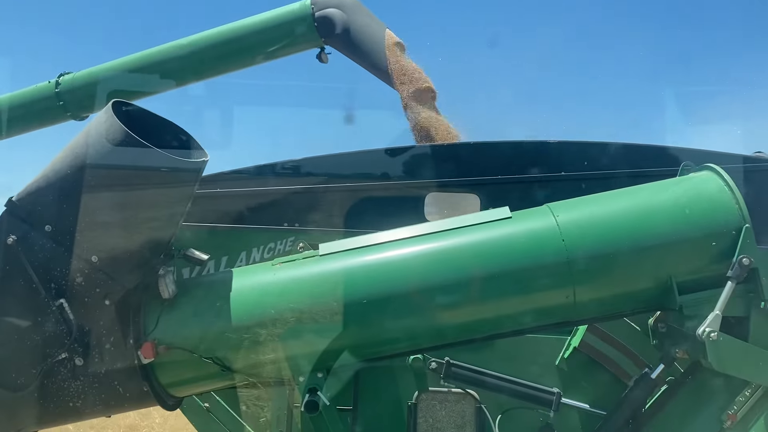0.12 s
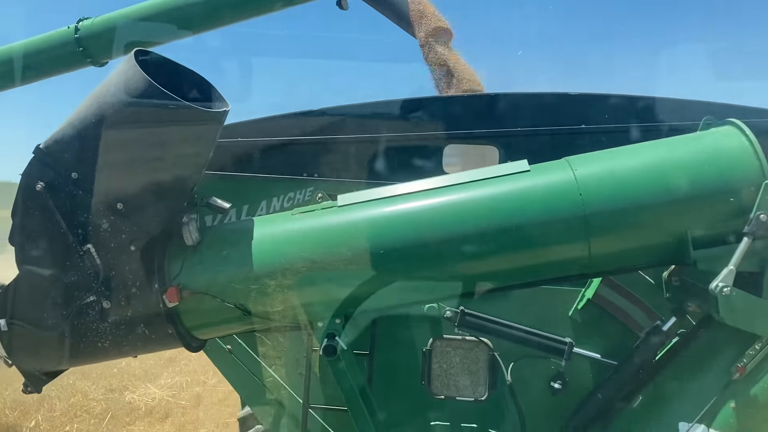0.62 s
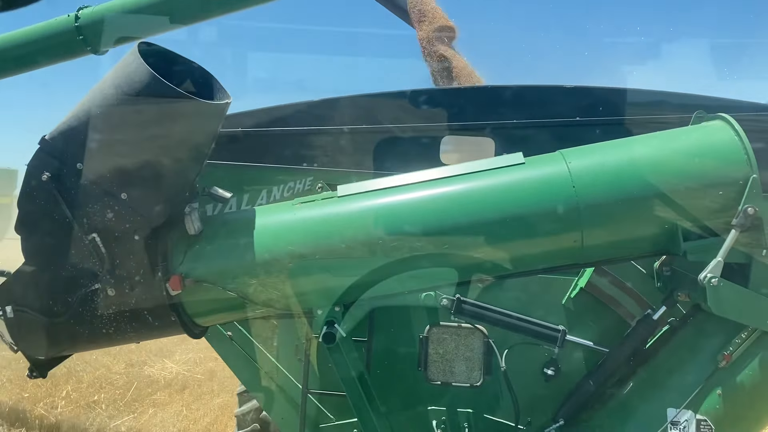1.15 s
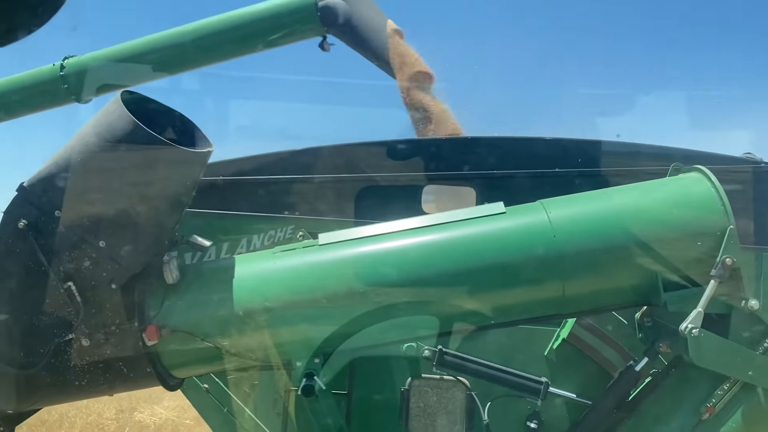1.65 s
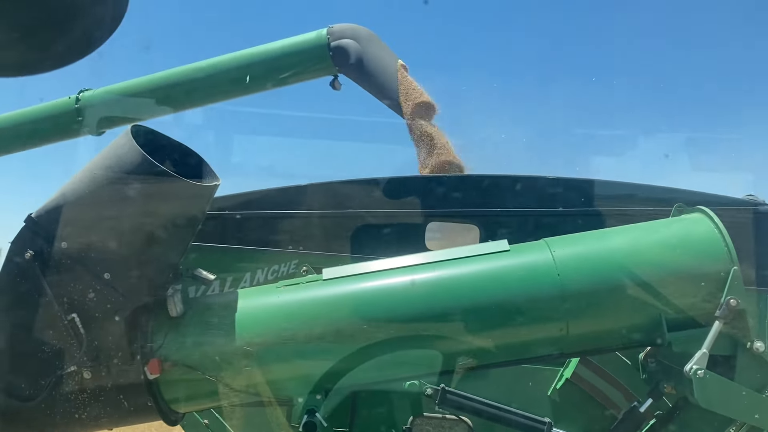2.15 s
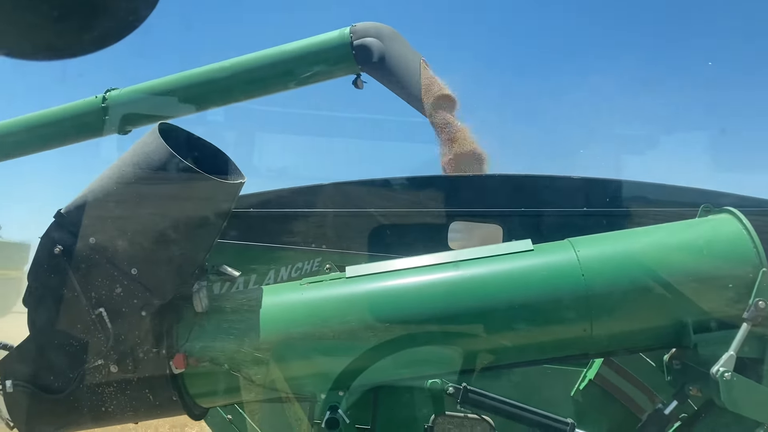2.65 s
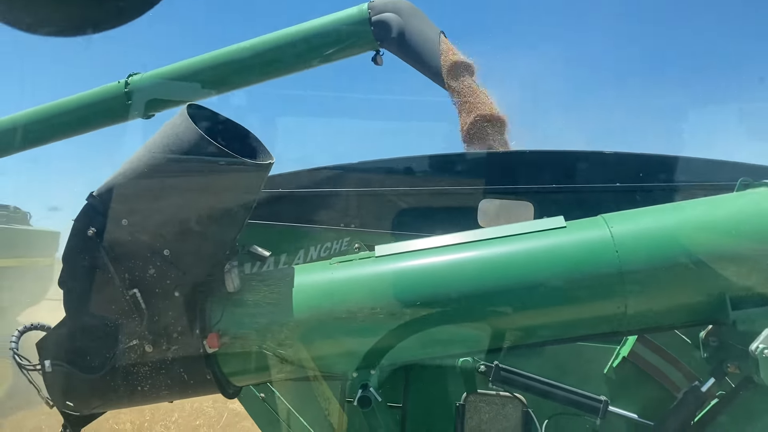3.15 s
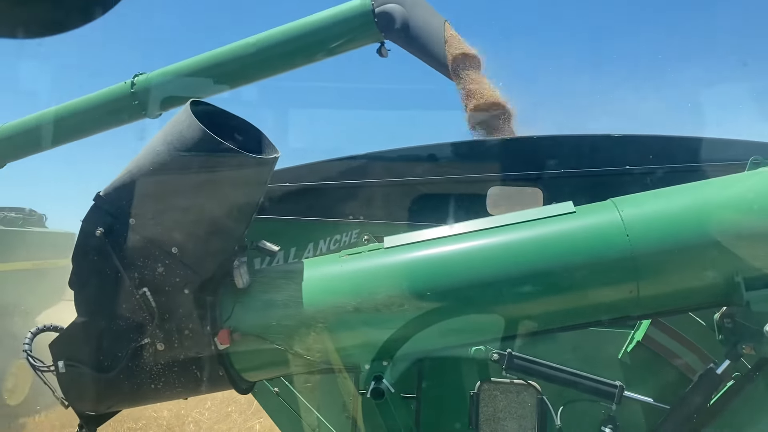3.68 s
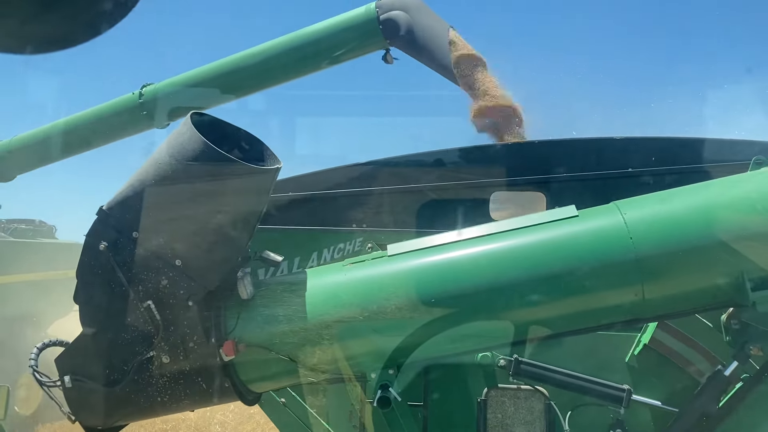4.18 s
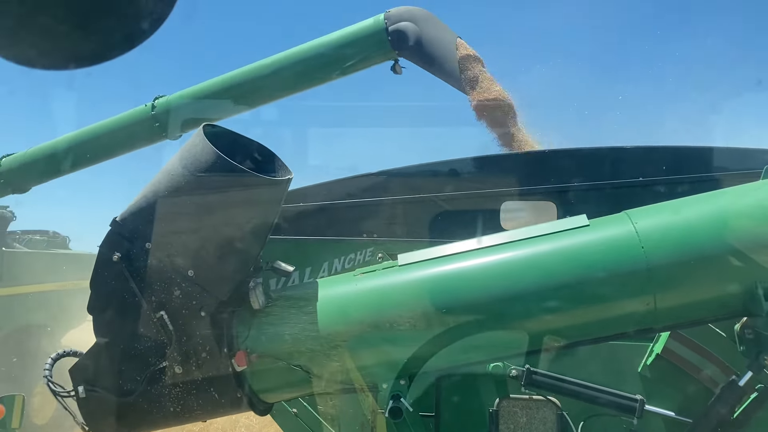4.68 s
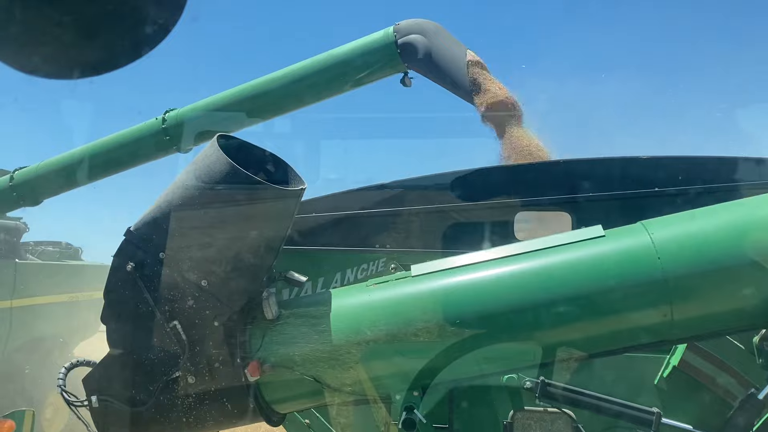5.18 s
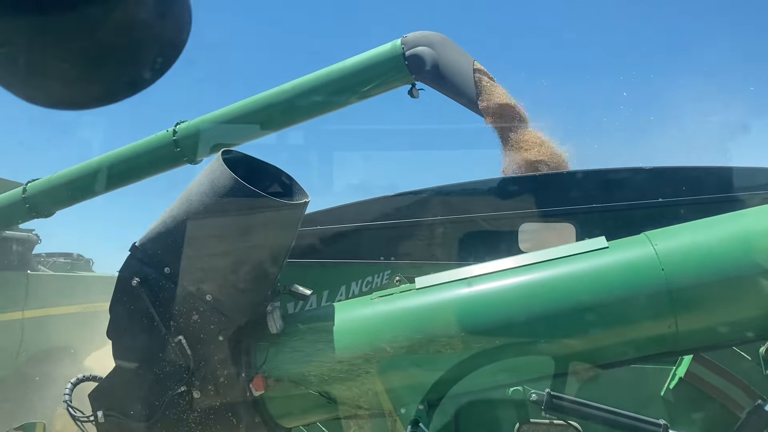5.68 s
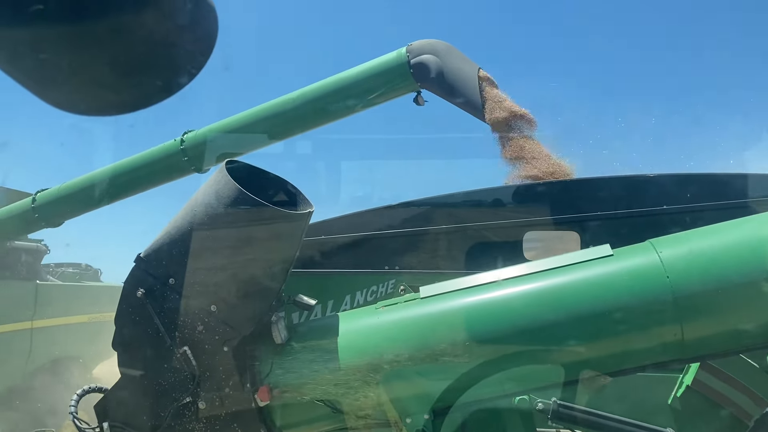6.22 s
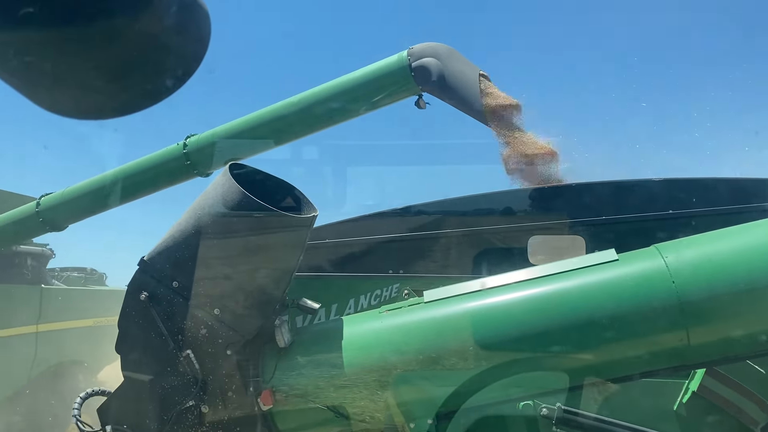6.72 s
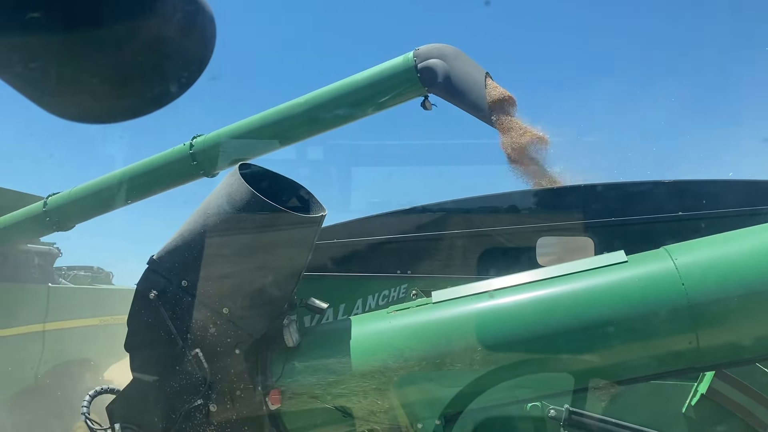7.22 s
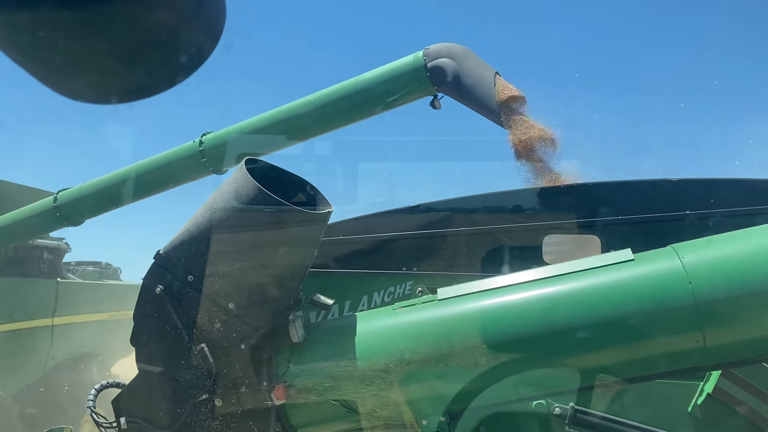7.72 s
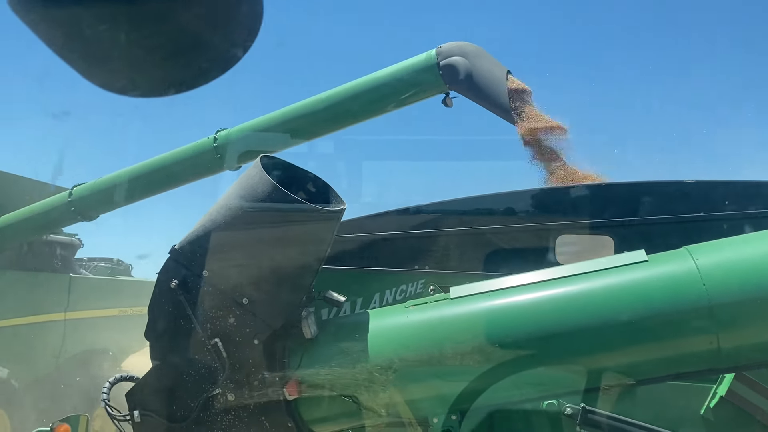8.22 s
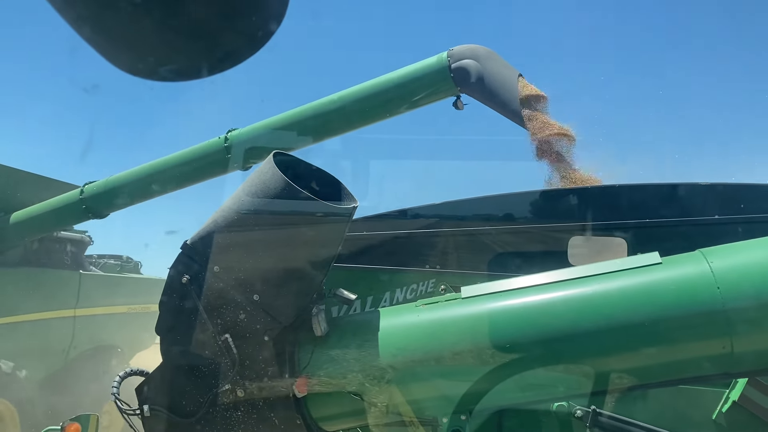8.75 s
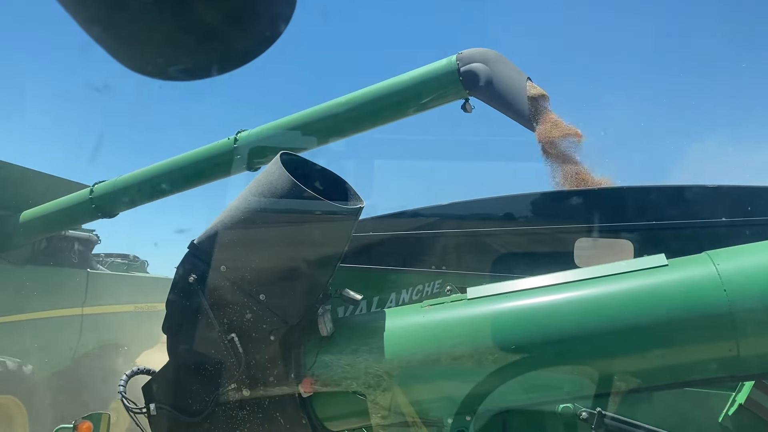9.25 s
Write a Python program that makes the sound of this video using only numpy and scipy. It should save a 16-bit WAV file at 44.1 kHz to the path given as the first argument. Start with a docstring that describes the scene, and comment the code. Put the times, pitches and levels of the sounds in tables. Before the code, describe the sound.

Heard from inside a closed tractor cab, a six-cylinder diesel drones steadily at constant speed, with a heavy low rumble that throbs irregularly as the cab jolts over ground. Hydraulic pump and gear hums sit above it, with a faint fluttering whine, soft fan hiss and a barely audible high whistle. Brief dry rattles scatter throughout; a few short rising squeaks come early. Close handheld stereo, bass-heavy.

```python
"""A six-cylinder diesel booms through the cab of a tractor crossing a field: sines on its cycle orders.
Sines locked to its speed make the pump and gear meshes hum; others drift freely as whine and turbo whistle.
Shaped noise makes the rumble, cab drone and vent air; loose fittings rattle (noise bursts through
resonances) and joints creak (gliding sines). Two microphone ports a few centimetres apart hear it."""
import sys
import numpy as np
from scipy import signal
from scipy.fft import rfft, irfft, next_fast_len
from scipy.io import wavfile
from scipy.ndimage import uniform_filter1d

SR = 44100
rng = np.random.default_rng(int(sys.argv[2]) if len(sys.argv) > 2 else 0)


def inscribe(sig):
    """Save sig as 16-bit PCM at rate SR to the path in sys.argv[1].

    A 1-D sig is mono; a 2-D sig holds one channel per row.
    Samples are clipped to [-1, 1] before scaling.
    """
    pcm = np.round(np.clip(np.atleast_2d(sig).T, -1, 1) * 32767)
    wavfile.write(sys.argv[1], SR, pcm.astype(np.int16))


def gain_from_db(level_db):
    """Convert decibel levels to linear amplitude factors (20 dB per decade)."""
    decades = np.asarray(level_db, float) / 20
    return 10 ** decades


N = 413216
T = np.arange(N) / SR
MUTE_DB = -200  # shuts a noise out of a frequency range
EDGE_HZ = 15750  # top of the hiss and the rattles


def evened(x):
    """Scales to rms 1."""
    return x / np.sqrt(np.mean(x ** 2) + 1e-20)


def curve(rows, column):
    """One column of a time table at every sample."""
    return np.interp(T, [r[0] for r in rows], [r[column] for r in rows])


def read(points, hz):
    """A spectrum table on a log-frequency axis."""
    f, value = np.transpose(points)
    return np.interp(np.log(hz + 1), np.log(f + 1), value)


def wander(rate_hz):
    """Random wavering of rms 1: 16 sines of random phase up to a rate, held for 64 samples."""
    slow_t = T[::64]
    rates = np.geomspace(rate_hz / 20, rate_hz, 16)
    total = sum(np.sin(2 * np.pi * (f * slow_t + rng.random())) / np.sqrt(f) for f in rates)
    return evened(total).repeat(64)[:N]


def bump(s, half_s):
    """A bell in time, down to 1/e half_s away from its middle."""
    return np.exp(-((T - s) / half_s) ** 2)


def tone(hz, db, tilt_db=0., lead=0.):
    """A sine of rms level db, tilted left-right by tilt_db; the right port leads by lead radians."""
    angle = 2 * np.pi * (np.cumsum(hz) / SR + rng.random())
    left = gain_from_db(tilt_db / 2) * np.sin(angle)
    right = gain_from_db(-tilt_db / 2) * np.sin(angle + lead)
    return np.sqrt(2) * gain_from_db(db) * np.array([left, right])


def level(name):
    """A strong tone's usual dB with its slow wavering and its swells."""
    # usual level by tone name: (level_db, wavering_depth_db rms)
    usual = {"stroke": (-37, 1.5), "stroke x2": (-40, 3.4), "stroke x3": (-46, 1.2), "charge": (-41.5, 1.1),
             "fifteenth": (-30.5, 3.4), "firing": (-25, 0.89)}
    # passing swells and dips by tone name: (middle_s, half_length_s, lift_db)
    swells = {"stroke": [(.5, 0.24, 7), (1.75, 0.23, -8), (2.3, 0.36, 1), (3.45, .2, 2), (6.95, 0.18, -12),
              (8.1, .12, -11)], "stroke x2": [(.55, 0.26, 9), (1.2, 0.33, 7.5), (2.6, 0.25, 3.5),
              (3.45, 0.18, 4.5), (5.45, 0.17, 6.5), (6.05, .2, -7), (8.55, 0.26, 3.5)],
              "stroke x3": [(.7, .5, -7), (2.45, 0.49, 4.5), (5.7, 0.67, 2.5), (7.4, 0.28, 1.5),
              (8.7, 0.4, 2.5)], "charge": [(.3, .3, 5), (2.7, 0.23, 3.5), (3.1, 0.083, -10),
              (3.6, 0.18, 3.5), (8.6, 0.22, 4)], "fifteenth": [(.65, 0.14, 6), (1.75, .25, -6),
              (2.4, 0.24, 1), (6.75, 0.31, 6.5), (7.7, 0.23, 5), (8.5, 0.16, 6)], "firing": [(.65, 0.14, 4),
              (5.3, 0.12, 2), (8.8, 0.27, -5.5)]}
    db, depth_db = usual[name]
    lift = sum(lift_db * bump(s, half_s) for s, half_s, lift_db in swells[name])
    return db + depth_db * wander(3.) + lift


def resonate(x, hz, width):
    """A band-pass resonance of gain 1."""
    return signal.lfilter(*signal.iirpeak(hz, hz / width, SR), x)


def at_ports(one, other, db_of_hz):
    """Colours two unrelated draws of a sound and mixes them into a partly alike, phase-shifted pair."""
    # how the ports differ: (hz, likeness 0-1, right_lead_rad)
    port_pair = [(45, 1, 0), (62, 0.95, -0.1), (85, 0.94, 0), (345, 0.92, 0.23), (700, 0.81, 0.69),
                 (910, 0.36, 0.93), (1115, 0.23, 3), (2390, 0.29, 3.0), (2820, 0.11, 4), (3450, 0.29, 4),
                 (3910, 0.24, 3), (4220, 0.95, 8), (4880, 0, 5), (5500, .28, 4.5), (6170, 0.4, 4.5),
                 (7050, 1, 6.5)]
    # balance of the ports: (hz, left_minus_right_db)
    balance = [(40, 1.5), (80, -1.2), (210, -0.5), (500, 3), (1790, -0.5), (2740, -1), (6400, -.5),
               (9800, 0)]
    in_step_hz, delay_s = 6940, 1 / 4390  # the treble reaches the right port earlier
    hz = np.fft.rfftfreq(N, 1 / SR)
    f, alike, lead = np.transpose(port_pair)
    alike = np.clip(np.interp(hz, f, alike), 0, 1)
    # above the last point a steady delay holds
    lead = np.where(hz > f[-1], 2 * np.pi * (hz - in_step_hz) * delay_s, np.interp(hz, f, lead))
    left = rfft(one)
    right = (alike * left + np.sqrt(1 - alike ** 2) * rfft(other)) * np.exp(1j * lead)
    tilt = gain_from_db(read(balance, hz) / 2)
    return irfft(np.array([left * tilt, right / tilt]) * gain_from_db(db_of_hz(hz)), N)


def engine(cycle_hz):
    """Cylinders differ, so many orders of the engine cycle sound; each wavers on its own."""
    # weaker tones of the engine cycle: (order, level_db before wavering)
    weak_orders = [(2, -62), (3, -45), (4, -32), (7, -37), (10, -31), (11, -35), (17, -43), (18, -43)]
    firing, fifteenth = 6, 15  # cycle orders of the two strongest tones
    out = sum(tone(k * cycle_hz, db + 0.92 * wander(4.), -.6, 0.) for k, db in weak_orders)
    out += tone(firing * cycle_hz, level("firing") + 0.78 * wander(6.2), -1.7, 0.1)
    out += tone(fifteenth * cycle_hz, level("fifteenth") + 1.62 * wander(25.), -1.1, -0.06)
    return out


def pump(stroke_hz):
    """Hydraulic pump: its piston rate and two harmonics, plus a charge tone at 4/3 of that rate."""
    # stereo place of each piston tone: (left_minus_right_db, right_lead_rad)
    places = [(0.5, 0.62), (-1, -0.43), (-1, 1.92)]
    out = tone(4 / 3 * stroke_hz, level("charge") + 1.5 * wander(20.), 1.1, -.2)
    for k, name in enumerate(("stroke", "stroke x2", "stroke x3")):
        out += tone((k + 1) * stroke_hz, level(name) + 2.6 * wander(30.), *places[k])
    return out


def meshes(stroke_hz):
    """Weak gear-mesh tones, locked to the engine, that waver in level."""
    # gear meshes: (teeth_per_pump_stroke, level_db before wavering, left_minus_right_db, right_lead_rad)
    gears = [(1.028, -46, 0, 0), (2.374, -50, 5, -.5), (3.733, -65, 0, 3), (4.732, -68, 0, 3),
             (6.73, -63, 0, 2.5), (7.785, -63, -1, 3)]
    return sum(tone(teeth * stroke_hz, db + 2.6 * wander(6.6), tilt, lead)
               for teeth, db, tilt, lead in gears)


def transmission_whine():
    """A single transmission whine whose pitch and level drift and flutter."""
    # drift of the whine before its flutter: (time_s, pitch_hz, level_db)
    drift = [(0.0, 1855, -54), (0.62, 1856, -55), (0.68, 1852, -45), (0.76, 1858, -45), (0.82, 1876, -54),
             (1.36, 1867, -50), (1.84, 1846, -54), (2.4, 1849, -51), (2.64, 1861, -53), (3.15, 1851, -54),
             (3.3, 1852, -50), (4.0, 1859, -48), (4.4, 1854, -48), (4.6, 1859, -53), (4.9, 1868, -52),
             (5.5, 1853, -48), (6.2, 1853, -52), (6.96, 1855, -47), (7.6, 1855, -52), (8.1, 1860, -50),
             (8.5, 1846, -50), (9.37, 1852, -51)]
    pitch_hz = curve(drift, 1) + 8. * wander(60.)
    return tone(pitch_hz, curve(drift, 2) + 2.6 * wander(60.), 3., .8)


def turbocharger():
    """A faint, unsteady high whistle from the turbocharger."""
    # pitch as it follows the load, before its flutter: (time_s, pitch_hz)
    drift = [(0, 8060), (.5, 8030), (1.7, 7870), (2.55, 7955), (2.9, 7950), (4.2, 7790), (4.7, 7800),
             (5.0, 7900), (5.4, 7935), (6.6, 7900), (8.2, 7950), (8.7, 8040), (9.37, 8270)]
    db = -73 + 3. * wander(2.) + 3. * wander(12.)
    return tone(curve(drift, 1) + 5. * wander(20.), db, 0., 1.4)


def panels_db(hz):
    """The lift that ringing cab panels give to a noise, their powers added to it."""
    # panel resonances: (pitch_hz, width_hz, ringing_db relative to the plain noise)
    panels = [(362, 14, 2), (557, 16, 3), (602, 14, 3), (632, 30, 1.5), (666, 16, 3), (770, 20, 0),
              (860, 50, 2), (1058, 40, 1), (1176, 22, 2), (1259, 20, 1), (1313, 30, 1), (1582, 70, -1),
              (2100, 70, 1), (2454, 35, 2), (2600, 40, 0), (3154, 50, 0), (3445, 50, 1)]
    ringing = sum(gain_from_db(2 * db) / (1 + (2 * (hz - f) / width) ** 2) ** 2 for f, width, db in panels)
    return 10 * np.log10(1 + ringing)


def boom():
    """Random shaking of frame and panels, plus the drone of the cab air."""
    # structure-borne rumble before shaking and panel lift: (hz, level_db_per_hz)
    rumble = [(20, -68), (30, -67), (38, -57), (45, -54.5), (65, -44.5), (85, -47.5), (100, -35.5),
              (115, -42.5), (145, -41), (160, -42), (180, -44), (215, -47), (250, -48.5), (295, -56),
              (340, -59), (385, -62.5), (460, -63.0), (520, -60.5), (560, -58.5), (610, -56.5), (650, -60),
              (720, -62.5), (820, -67.5), (870, -65.5), (980, -71), (1100, -73)]
    frame_top_hz = 190  # below it the frame shakes with the ground
    drive = rng.standard_normal((2, N)) * np.sqrt(SR / 2)  # 0 dB per Hz

    def frame_db(hz):
        return read(rumble, hz) + MUTE_DB * (hz > frame_top_hz)

    def skin_db(hz):
        outside = (hz <= frame_top_hz) | (hz > rumble[-1][0])
        return read(rumble, hz) + panels_db(hz) + MUTE_DB * outside

    frame = at_ports(*drive * gain_from_db(1.3 * wander(8.)), frame_db)  # uneven shaking
    return frame + at_ports(*drive, skin_db) + drone()


def drone():
    """The cab air resonates near one pitch as the ground shakes it, and throbs on the jolts."""
    # strongest throbs, added to the steady drone as jolts go through the cab: (middle_s, level_db)
    throbs = [(.15, -20.5), (.38, -16.5), (.59, -22), (.71, -25), (.79, -21), (1.04, -23), (1.46, -15.5),
              (1.64, -18.5), (1.89, -24), (2.06, -15.5), (2.31, -24), (2.49, -21.5), (2.77, -23),
              (2.93, -19.5), (3.06, -19), (3.42, -15.5), (3.6, -21), (3.75, -21), (3.88, -18.5),
              (4.12, -24), (4.92, -23.5), (5.65, -23.5), (6.07, -22), (6.26, -13.5), (6.53, -24),
              (6.642, -19.5), (6.85, -31), (7.03, -19.5), (7.23, -18), (7.38, -19), (7.6, -21.5),
              (7.75, -22), (7.92, -25), (8.21, -21), (8.5, -22), (8.75, -17.5), (9.07, -19), (9.24, -18.5)]
    drone_hz, width_hz = 162.27, 7.7
    swell = gain_from_db(-25.5 + 1.5 * wander(10.))
    swell = swell + sum(gain_from_db(db) * bump(s, 0.025) for s, db in throbs)
    air = rng.standard_normal((2, N))
    for _ in range(2):
        air = resonate(air, drone_hz, width_hz)
    envelope = abs(signal.hilbert(air, next_fast_len(N))[:, :N])
    air /= envelope ** 0.86 + 1e-9  # a driven mode: steadier than noise
    return at_ports(*evened(air) * swell, lambda hz: -30 * np.log2(hz / drone_hz + 1e-9) ** 2)


def rattles():
    """Each bump shakes out a short clump of tiny knocks that ring the fittings unevenly."""
    # clumps, levels before colouring and a common trim:
    # (time_s, level_db, length_s, struck_hollow_part_hz, hollow_part_gain_db)
    clumps = [(0.402, -34, 0.035, 2400, 18), (0.9283, -41, 0.027, 2850, 15), (1.001, -37, 0.03, 2850, 16),
              (1.4235, -34, 0.02, 2170, 12), (1.777, -35.5, 0.027, 2320, 19),
              (1.896, -35.5, 0.023, 2200, 23), (2.9115, -38, 0.03, 2130, 14),
              (3.016, -38.5, 0.022, 2140, 15), (3.8887, -31, 0.036, 3450, 16.5),
              (4.1584, -45, 0.03, 2030, 14), (4.4408, -46, 0.034, 2250, 14), (4.462, -44, 0.03, 2120, 14),
              (4.594, -35.5, 0.041, 2660, 11), (4.6763, -33, 0.036, 2760, 17),
              (5.4111, -37, 0.027, 2610, 19), (5.485, -29.5, 0.02, 2240, 18),
              (5.6267, -35.5, 0.025, 2800, 15), (5.7024, -39, 0.026, 2220, 15),
              (6.356, -38.5, 0.03, 2120, 17), (6.6136, -36.5, 0.028, 2340, 14),
              (7.378, -37.5, 0.027, 2130, 16), (7.6233, -36.5, 0.024, 2050, 14),
              (7.7458, -35.5, 0.03, 2830, 12), (8.033, -34, 0.038, 3450, 12), (8.5974, -44, 0.03, 2100, 14),
              (8.8067, -36.5, 0.034, 2540, 16)]
    # colour of all rattles: (hz, gain_db)
    colour = [(1200, -32), (2200, 3.5), (3400, 3.5), (5000, 1), (8000, -5.5), (12000, -6.5), (15600, -22)]
    # fittings that ring, before the scatter of each clump: (pitch_hz, width_hz, gain_db)
    fittings = [(3150, 64, 3), (3400, 36, 9.5), (3950, 53, 8), (4870, 89, 4), (5800, 89, -0.5),
                (6490, 140, 5.5), (7800, 87, 9), (9600, 120, 10.5), (10550, 100, 5.5)]
    lead_in_s = .004  # the clump starts this long before its time
    out, size = np.zeros((2, N)), SR // 5
    u = np.arange(size) / SR
    rise = 1 - np.exp(-u / .004)
    draws = rng.standard_normal((len(clumps), 4, size))
    shares = rng.standard_normal((len(clumps), len(fittings)))
    for (s, db, length, body_hz, body_db), draw, share in zip(clumps, draws, shares):
        shape = rise * (np.exp(-(u / max(length, .005)) ** 2.2) + 0.19 * np.exp(-u / 0.048))
        knocks = draw[:2] * gain_from_db(3.1 * draw[2:]) * shape  # scattered levels make the noise spiky
        rung = knocks + gain_from_db(body_db) * resonate(knocks, body_hz, 70.)
        for (f, width, gain_db), q in zip(fittings, share):
            rung += gain_from_db(gain_db + 4.1 * q) * resonate(knocks, f * (1 + 0.012 * q), width)
        part = out[:, round((s - lead_in_s) * SR):][:, :size]
        part += gain_from_db(db - 6.5) * rung[:, :part.shape[1]]
    return at_ports(*out, lambda hz: read(colour, hz) + MUTE_DB * (hz > EDGE_HZ))


def creaks():
    """Short rising squeaks of a seat or panel joint, far out of phase at the ports."""
    # squeaks: (start_s, length_s, from_hz, to_hz, level_db at the middle)
    squeaks = [(1.47, .1, 1030, 1050, -56), (2.04, .1, 1050, 1060, -52), (2.24, .18, 1080, 1165, -54),
               (3.797, .17, 1026, 1075, -41), (4.27, .12, 1000, 1062, -48)]
    out = np.zeros((2, N))
    for s, length, from_hz, to_hz, db in squeaks:
        u = np.clip((T - s) / length, 0, 1)
        out += np.sin(np.pi * u) * tone(from_hz + (to_hz - from_hz) * u, db, 1.5, 2.2)
    return out


def grainy(x, depth_db):
    """Breaks a smooth noise into small patches of time and pitch, each with its own level."""
    z = signal.stft(x, nperseg=1024, noverlap=768)[2]
    patches = uniform_filter1d(rng.standard_normal(z.shape[1:]), size=3, axis=0)
    patches = evened(uniform_filter1d(patches, size=5, axis=1))
    gain = evened(gain_from_db(depth_db * patches))
    return signal.istft(z * gain, nperseg=1024, noverlap=768)[1][:, :N]


def hiss():
    """Fan and vent air: turbulent noise that flutters a little."""
    # fan roar and vent air before panel lift: (hz, level_db_per_hz)
    turbulence = [(1100, -74.5), (1350, -74.5), (1570, -72.5), (1750, -75.5), (2080, -72), (2250, -73.5),
                  (2450, -73.5), (2800, -76), (3300, -82.5), (4000, -82.5), (4600, -86), (5500, -91.5),
                  (7000, -90.5), (8000, -90.5), (10000, -93.5), (12000, -97.5), (13500, -101),
                  (14800, -102), (15700, -104)]
    flutter = gain_from_db(0.38 * wander(14.0) + 0.25 * wander(150.))
    air = grainy(rng.standard_normal((2, N)), 2.0) * np.sqrt(SR / 2) * flutter

    def air_db(hz):
        outside = (hz <= turbulence[0][0]) | (hz > EDGE_HZ)
        return read(turbulence, hz) + panels_db(hz) + MUTE_DB * outside

    return at_ports(*air, air_db)


def move_microphone(noise):
    """The noise changes colour as the microphone moves through the standing waves of the cab."""
    # colour where the microphone is held at first: (hz, gain_db)
    first_place = [(200, 0.5), (370, 5), (520, 0.5), (700, -7.5), (850, 1), (1150, 2), (1600, 0)]
    at_first = irfft(rfft(noise) * gain_from_db(read(first_place, np.fft.rfftfreq(N, 1 / SR))), N)
    moved = np.clip((T - 0.71) / 0.2, 0, 1)  # moves at 0.71 s, for 0.2 s
    return (1 - moved) * at_first + moved * noise


def scene():
    """Everything in the cab; engine, pump and meshes follow one speed, whine and whistle drift alone."""
    # engine speed, as the piston rate of the pump geared to it: (time_s, stroke_hz before hunting)
    speed = [(0.0, 314.6), (0.5, 313.2), (1.1, 317.7), (1.5, 315.9), (2.7, 314.2), (3.1, 316.3),
             (3.5, 313.3), (3.9, 315.6), (5.2, 314.3), (5.5, 316.4), (5.9, 314.8), (6.9, 315.7),
             (7.3, 314.1), (8.1, 316.1), (8.4, 313.8), (8.7, 313.8), (8.9, 315.4), (9.37, 315.3)]
    stroke_hz = curve(speed, 1) * (1 + .0022 * wander(10.))  # the governor hunts a little
    cycle_hz = stroke_hz / 24.14  # pump strokes in one engine cycle of two crank turns
    tones = engine(cycle_hz) + pump(stroke_hz) + transmission_whine() + turbocharger()
    noise = move_microphone(boom() + hiss() + meshes(stroke_hz))
    return tones + noise + rattles() + creaks()


def roll_off(x):
    """The treble ends steeply here."""
    return signal.sosfilt(signal.butter(12, 17100, fs=SR, output="sos"), x)


def record(dry):
    """Delivers the finished mix of both ports."""
    return roll_off(dry)


dry = scene()
out = record(dry)
inscribe(out)
```